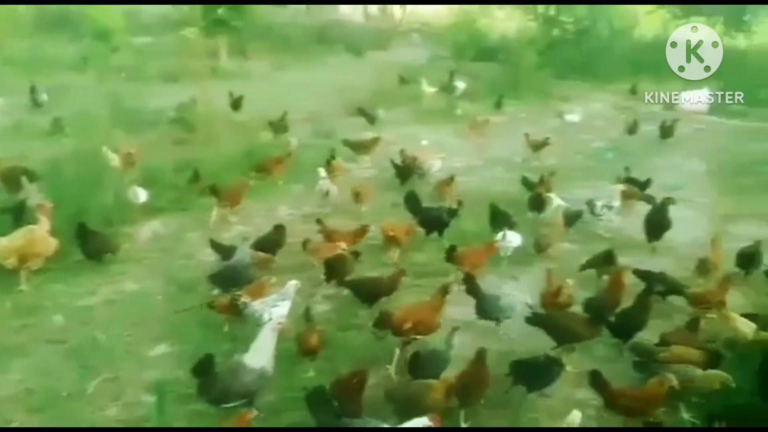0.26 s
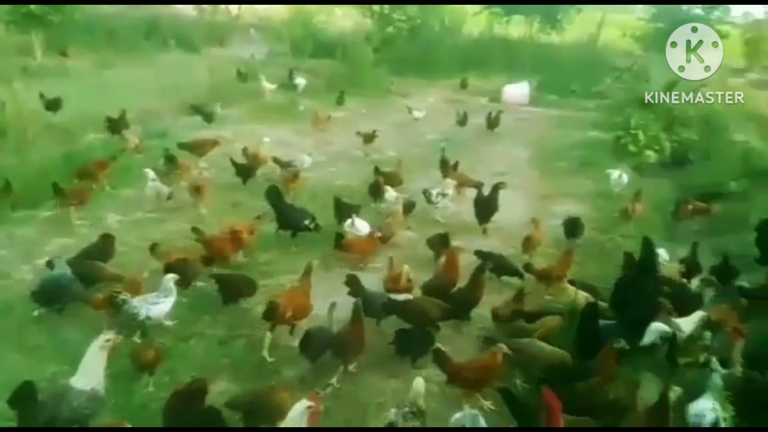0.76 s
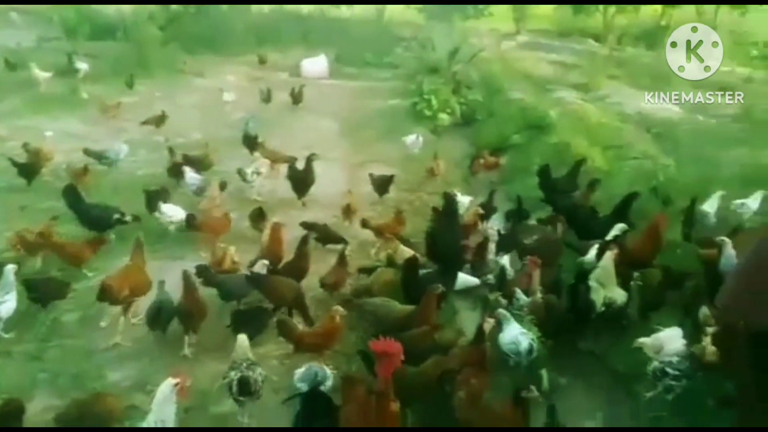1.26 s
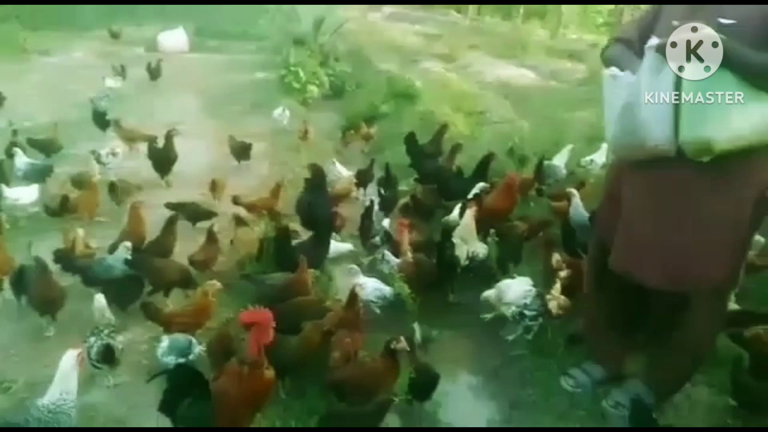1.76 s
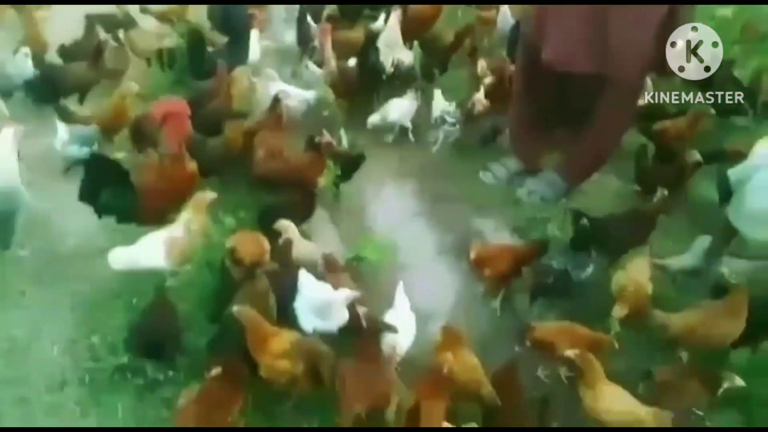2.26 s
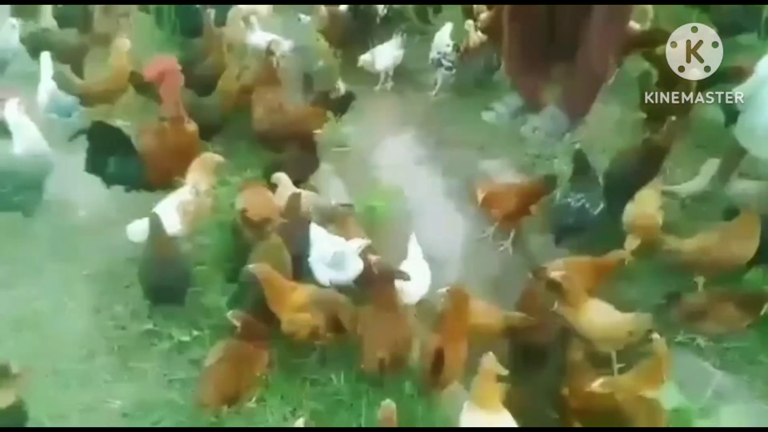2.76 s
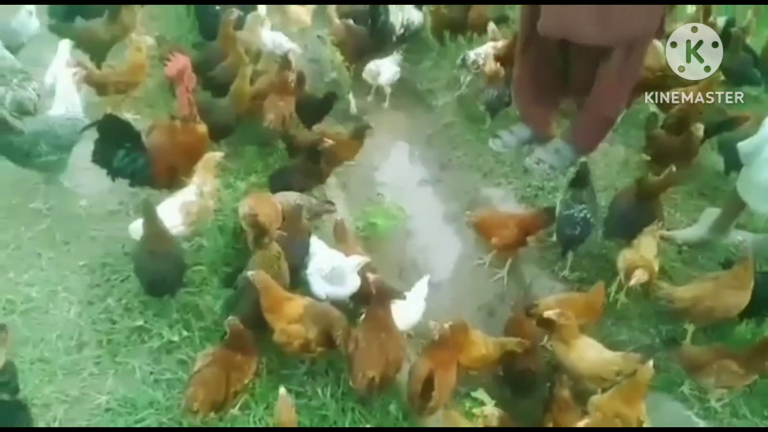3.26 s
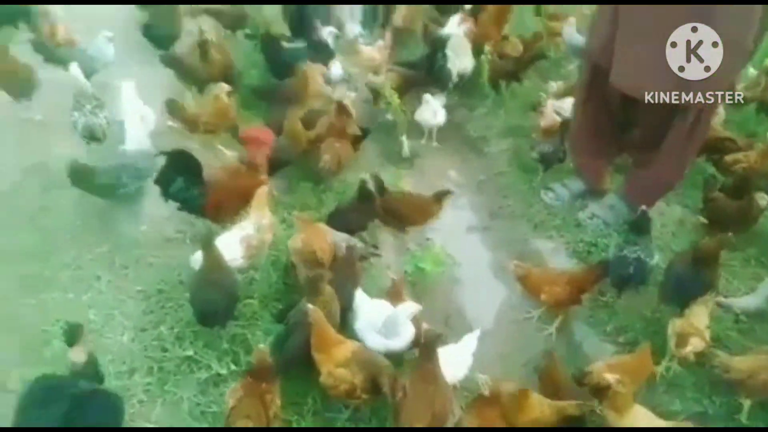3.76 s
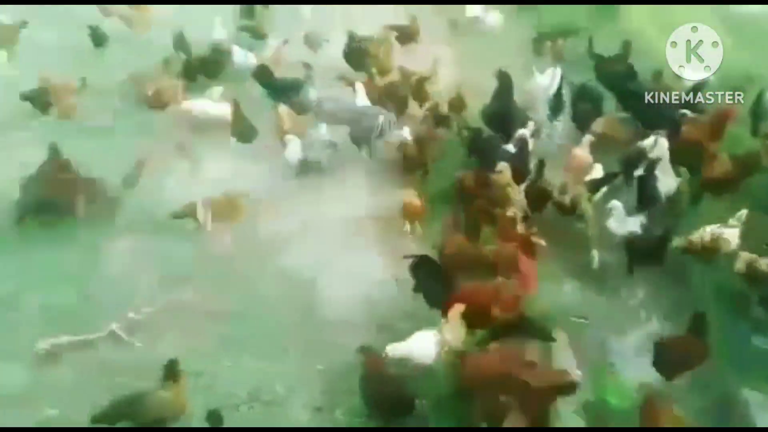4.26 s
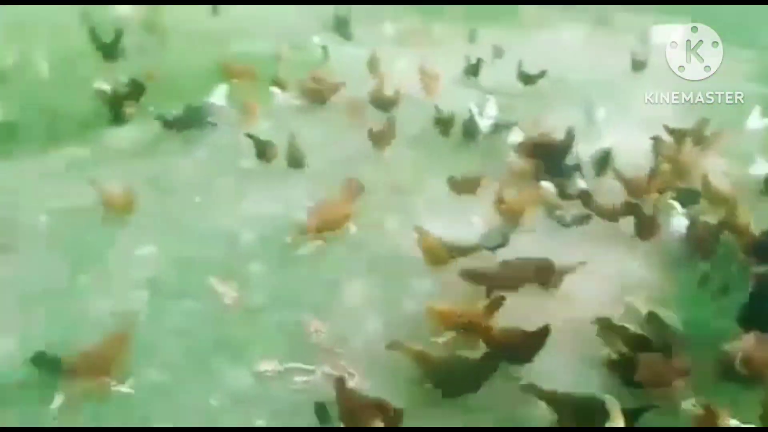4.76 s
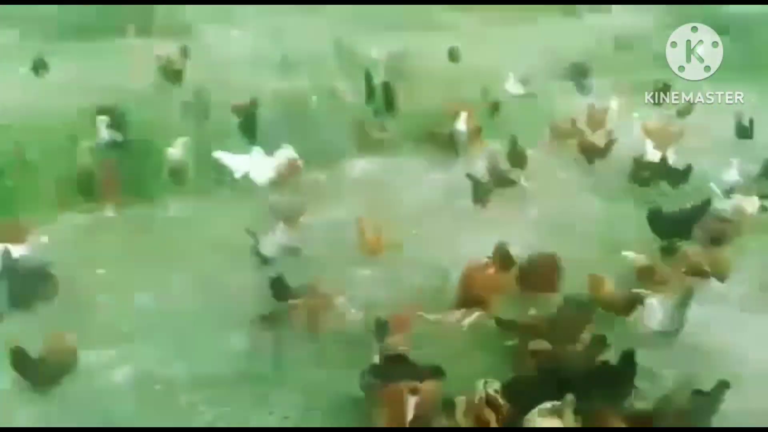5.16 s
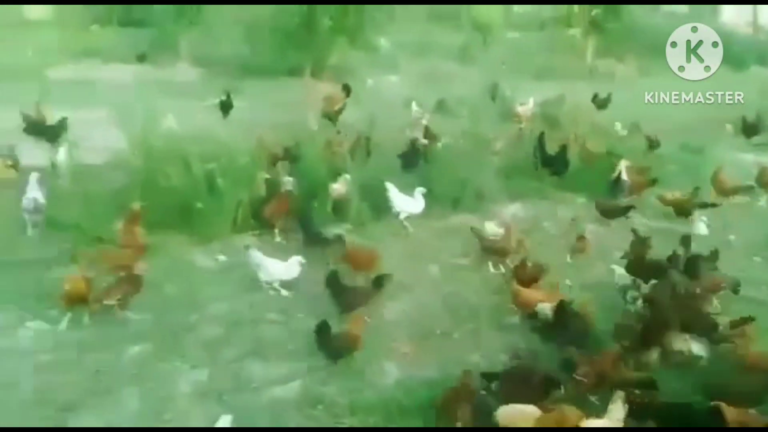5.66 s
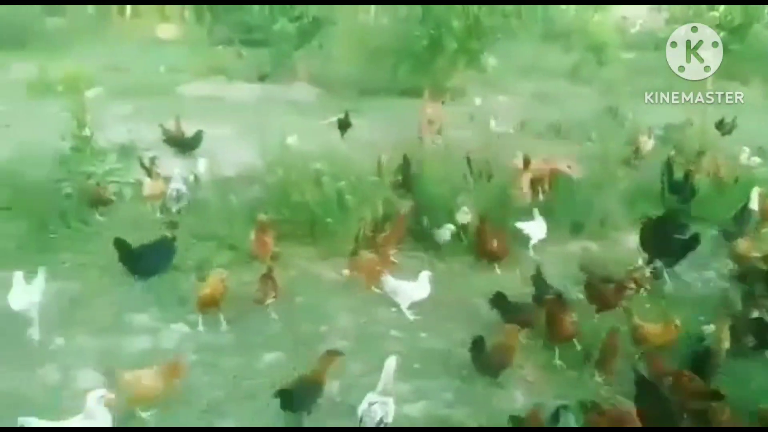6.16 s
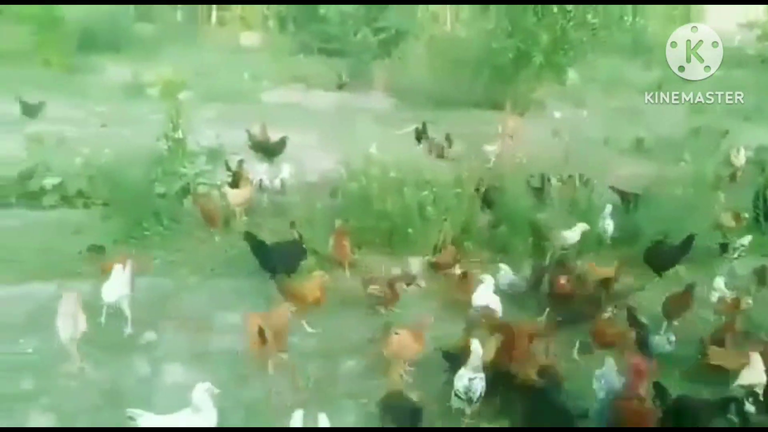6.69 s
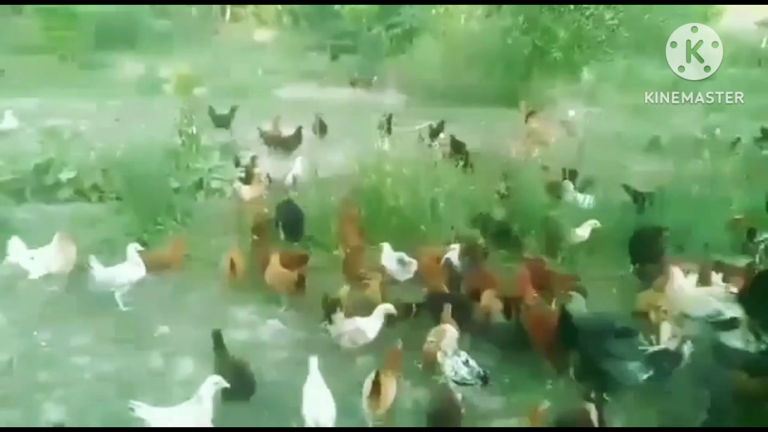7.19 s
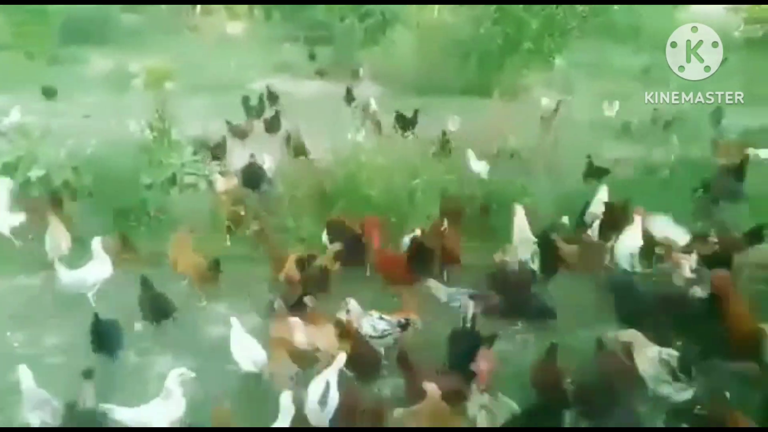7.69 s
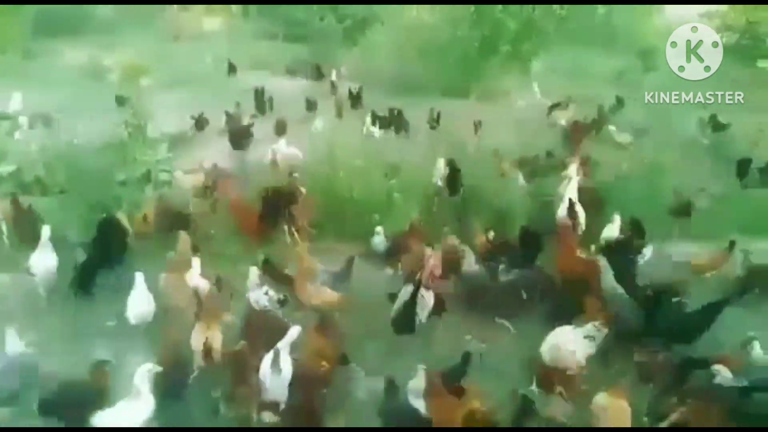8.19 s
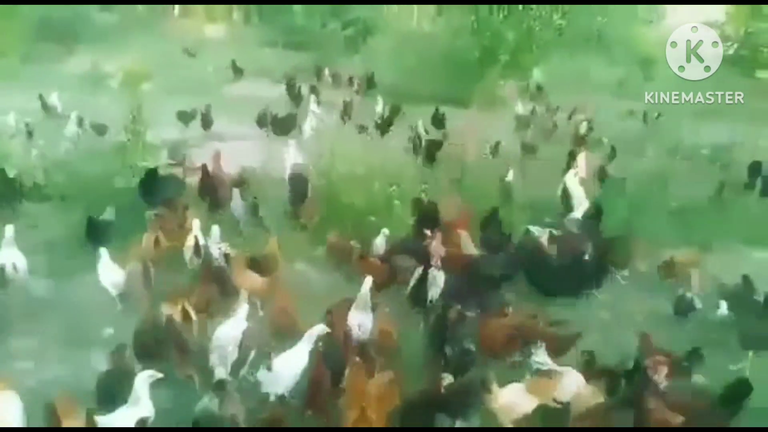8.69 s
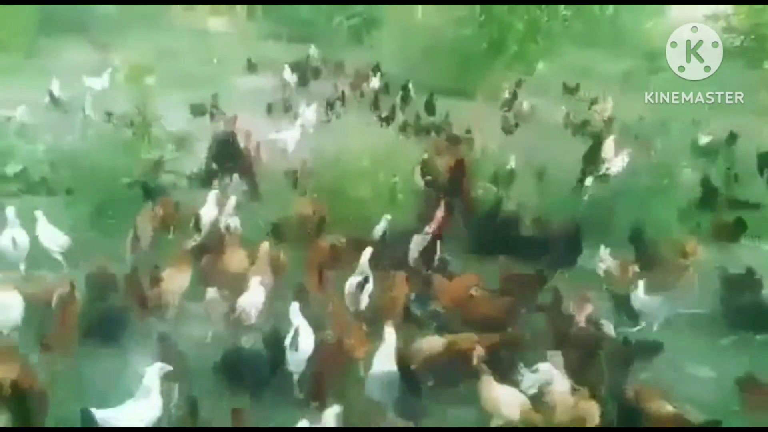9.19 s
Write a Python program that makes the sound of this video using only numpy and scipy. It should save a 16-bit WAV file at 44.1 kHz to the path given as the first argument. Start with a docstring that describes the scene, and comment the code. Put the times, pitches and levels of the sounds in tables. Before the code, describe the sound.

Open grassy yard, hand-held stereo microphone, low lumpy wind throughout. From 0 s dozens of young birds peep softly in short falling whistles, some nearer; at 0.1-0.5 s a gust roars, flutters and pops on the left. Low falling moans come around 0.8-1.6 s, then a harsh, ragged squawk at 1.75 s. The peeping drops out briefly near 2.2 s and returns. A distant cock holds a faint crow from 2.6 to 3.5 s. Finger thumps and scuffs strike the right at 2.8, 3.1 and 3.85 s, leaving that side muffled. At 4.3 s a loud sharp cluck opens a dense crowd of clucks, chips and quavering notes, with feet and wings rustling. Another strong cluck snaps at 6 s. Clucking thickens from 7.5 s; from 8.1 to 9 s one bird gives six clear yelps, each higher and shorter. Wind swells near 8.9 s, and clucks and peeps continue to the end.

```python
"""Young birds peep in falling whistles over a rumbling wind, in a big flock of hens and pullets crowding in for feed.
Then come moans, one harsh squawk, a far cock, dense clucks and quavering notes, and one bird's rising yelps.
Calls are swept sines, partials or resonant puffs, with dull yard echoes; wings and feet are shaped noise.
Wind on the hand-held microphone is low noise, with a gust that flutters and pops on the left.
A finger bumps the right port in thumps and scuffs, and then stays over it, muffling that side."""
import sys
import numpy as np
from scipy import signal
from scipy.fft import rfft, irfft, next_fast_len
from scipy.io import wavfile
from scipy.ndimage import uniform_filter1d

SR = 44100
rng = np.random.default_rng(int(sys.argv[2]) if len(sys.argv) > 2 else 0)


def pcm_store(signal):
    """Save signal as 16-bit PCM."""
    levels = np.round(np.clip(np.atleast_2d(signal), -1, 1) * 32767)
    wavfile.write(sys.argv[1], SR, levels.astype(np.int16).T)


N = 416304
TIME = np.arange(N) / SR
QUAVER_PER_S = 26   # pitch arches per second in a quavering note


def from_db(db):
    """Level: 20 dB is a tenfold amplitude."""
    return 10 ** (np.asarray(db) / 20)


def rms_one(x):
    """Normalisation: the mean square becomes one."""
    return x / np.sqrt(np.mean(x ** 2) + 1e-20)


def curve(rows, at=TIME):
    """Linear interpolation of each column of a table over its times."""
    s, *columns = np.transpose(rows)
    return [np.interp(at, s, column) for column in columns]


def band(x, hz, kind, order=2):
    """Butterworth filtering: a maximally flat passband."""
    sections = signal.butter(order, hz, kind, fs=SR, output="sos")
    return signal.sosfilt(sections, x + 1e-18)


def wander(n, per_s):
    """Slow random modulation: straight lines join unit normal values, per_s of them a second, about 0."""
    at = np.arange(n) * per_s / SR
    knots = rng.standard_normal(int(at[-1]) + 2)
    return np.interp(at, np.arange(len(knots)), knots)


def noise(spectrum):
    """Spectral shaping of white noise, uncorrelated between the two ports and of unit rms."""
    hz, db = np.transpose(spectrum)
    size = next_fast_len(N)
    bins = np.maximum(np.fft.rfftfreq(size, 1 / SR), 1)
    gain = from_db(np.interp(np.log(bins), np.log(hz), db))
    gain = gain * np.minimum(bins / hz[0], 1) ** 2   # 12 dB per octave below the first row
    white = rng.standard_normal((2, size))
    return rms_one(irfft(rfft(white) * gain, size)[:, :N])


def swell(s, rise, t60, hold=0):
    """Transient envelope: a Gaussian rise to 1 at time s, a hold, then exponential decay."""
    rising = np.exp(-np.minimum(((TIME - s) / rise) ** 2, 50))
    dying = from_db(-60 * np.clip((TIME - s - hold) / t60, 0, 3))
    return np.where(TIME < s, rising, dying)


def add(out, s, sound, pan_db):
    """Stereo localisation: the nearer port hears a bird louder and earlier (one sample each way per dB)."""
    for channel, side in enumerate((1, -1)):
        start = max(int(s * SR - side * pan_db), 0)
        part = sound[:max(N - start, 0)]
        out[channel, start:start + len(part)] += part * from_db(side * pan_db / 2)


def whistle(hz, overtone_db, jitter, flutter_db):
    """Frequency modulation of a near sine; its faint octave is cut off by the throat on high notes."""
    n = len(hz)
    phase = 2 * np.pi * np.cumsum(hz * (1 + jitter * wander(n, 243))) / SR
    envelope = np.sin(np.linspace(0, np.pi, n)).clip(0) ** 0.45
    envelope = envelope * from_db(flutter_db * wander(n, 89.4))
    overtone = from_db(overtone_db) / (1 + (2 * hz / 5700) ** 20)
    return np.sqrt(2) * envelope * (np.sin(phase) + overtone * np.sin(2 * phase))


def peep(length, start_hz, end_hz, arch, overtone_db):
    """Frequency glide: the pitch bends and sags ever faster; a steep fall roughens pitch and loudness."""
    rough_per_fall = 0.047   # roughness (0-1) per octave a second
    u = np.linspace(0, 1, int(length * SR))
    sag = .45 * u + .55 * u ** 3
    hz = (start_hz + (end_hz - start_hz) * sag) * (1 + arch * np.sin(np.pi * u))
    rough = np.clip(rough_per_fall * np.log2(start_hz / end_hz) / length, 0, .7)
    shaken_hz = hz * (1 + .08 * rough * wander(len(u), 900))
    voice = whistle(shaken_hz, overtone_db, jitter=.006, flutter_db=3)
    shake_db = 5 * rough * (wander(len(u), 500) - rough)
    return voice * from_db(shake_db + 3 * (u - .5))   # the voice gains 3 dB along the note


def trill(length, start_hz, end_hz, rate):
    """Periodic frequency modulation: the pitch bounds in arches and the note weakens at each dip."""
    quaver_depth = 0.1384   # share of the pitch
    t = np.arange(int(length * SR)) / SR
    arches = np.cumsum(rate * (1 + 0.286 * wander(len(t), 40))) / SR
    bound = np.abs(np.sin(np.pi * arches + rng.uniform(0, np.pi))) - 2 / np.pi   # mean near 0
    hz = np.linspace(start_hz, end_hz, len(t)) * (1 + quaver_depth * bound)
    return whistle(hz, overtone_db=-22, jitter=0.0256, flutter_db=4.0) * from_db(3.0 * bound)


def chip(length, top_hz):
    """Frequency modulation: a young bird's quick, quavering note follows part of a pitch arch."""
    u = np.linspace(-1, 1, int(length * SR)) + rng.uniform(-0.738, 1)
    return whistle(top_hz * np.exp(-.11 * u ** 2), overtone_db=-22, jitter=.075, flutter_db=6)


def cluck(length, main_hz, rough, arch=.2, rasp_hz=300, breath_db=-20):
    """Source and filter: the throat lifts the second partial, syrinx beats rasp it and air hisses through."""
    # partials of the voice, from the voice pitch upwards: mean level/dB
    partial_levels = [-12, 11, -7.5, -18, -30, -31, -43.5]
    n = int(3 * length * SR)
    u = np.linspace(-3, 3, n)   # in half lengths from the middle
    # the air comes in uneven pushes, each louder and higher at once
    push = wander(n, 150)
    bend = rough * (.1 * push + .06 * wander(n, 500) + .06 * rng.standard_normal() * u)
    pitch = main_hz / 2 * np.exp(bend - 2 * arch * np.tanh(u ** 2 / 2))
    phase = 2 * np.pi * np.cumsum(pitch) / SR
    voice = np.zeros(n)
    for k, db in enumerate(partial_levels, 1):
        voice += from_db(db + 4.7 * rng.standard_normal()) * np.sin(k * phase)
    voice = rms_one(voice)
    hiss = rms_one(band(rng.standard_normal(n), [1800, 3300], "band"))
    breath = from_db(breath_db) * hiss * (1 + np.sin(phase))
    beats = np.sin(2 * np.pi * np.cumsum(rasp_hz * (1 + 0.375 * wander(n, 200.7))) / SR)
    rasp = (1 + .9 * rough * beats) * from_db(6 * rough * push)
    # a loud core; before and after it the half-closed beak lets through a softer, duller voice
    core, skirt = np.exp(-u ** 8), .13 * np.hanning(n)
    call = rasp * ((voice + breath) * (core + skirt) + skirt * np.sin(phase))
    return rms_one(call) / np.sqrt(3)


def near_birds(peep_overtone_db=-21, pan_db=0.5):
    """Superposition of the peeps, quavering notes and clucks that stand out of the flock."""
    # whistled peeps: t/s, length/s, start f/Hz, end f/Hz, arch (share of the pitch), level/dB
    near_peeps = [(0, 0.062, 2510, 2030, 0.0012, -46), (0.052, 0.078, 4300, 3350, -0.04, -51),
                  (0.205, 0.069, 2630, 2470, 0.024, -46.5), (0.243, 0.27, 2870, 2045, 0.091, -45),
                  (0.387, 0.09, 2480, 2110, 0.0012, -39), (0.49, 0.11, 2814, 2040, -0.033, -47),
                  (0.55, 0.13, 3670, 2660, -0.0085, -48), (0.64, 0.16, 3930, 3130, 0.0071, -53.5),
                  (0.581, 0.14, 2650, 1843, 0.02, -39.5), (0.749, 0.085, 3350, 1950, -0.032, -34.5),
                  (0.935, 0.087, 2840, 2428, 0.0027, -43.5), (0.965, 0.25, 2368, 1940, 0.024, -47.5),
                  (1.149, 0.17, 2886, 2380, -0.057, -47), (1.24, 0.24, 2785, 2560, 0.00036, -50),
                  (1.215, 0.11, 4960, 4460, 0.055, -53), (1.318, 0.036, 2390, 1760, -0.024, -39.5),
                  (1.345, 0.17, 2510, 2075, -0.036, -44), (1.478, 0.052, 2960, 2420, -0.066, -35.5),
                  (1.48, 0.12, 2370, 1676, -0.096, -50), (1.64, 0.15, 3750, 3100, -0.026, -46),
                  (1.719, 0.12, 2590, 2204, -0.016, -40.5), (1.885, 0.055, 1895, 1560, -0.041, -41),
                  (2.384, 0.082, 3000, 2440, -0.023, -48), (2.569, 0.057, 2950, 2380, -0.015, -45.5),
                  (2.565, 0.33, 2525, 2150, -0.025, -46.5), (2.63, 0.17, 2850, 2600, 0.021, -50.5),
                  (2.92, 0.066, 2520, 2300, 0.0051, -39), (3.01, 0.19, 2760, 2100, 0.16, -43),
                  (3.57, 0.27, 2440, 2069, -0.051, -42.5), (3.94, 0.13, 2740, 1800, 0.056, -45),
                  (8.13, 0.043, 3466, 2300, 0.038, -42), (8.618, 0.075, 3610, 2920, -0.045, -40),
                  (9.045, 0.042, 3440, 2560, -0.0047, -39.5), (9.168, 0.059, 3065, 2140, -0.053, -45),
                  (9.269, 0.081, 2150, 1685, -0.016, -33.5)]
    # quavering notes: t/s, length/s, start f/Hz, end f/Hz, level/dB
    near_trills = [(4.598, 0.043, 2490, 2630, -35), (4.686, 0.024, 1510, 1940, -27),
                   (4.73, 0.038, 1945, 2480, -28), (4.775, 0.023, 1860, 2050, -19),
                   (5.101, 0.021, 2030, 1710, -27), (5.575, 0.024, 1700, 1930, -34),
                   (6.777, 0.15, 2990, 3190, -38.5), (7.015, 0.069, 2700, 2920, -38.5),
                   (7.406, 0.11, 3510, 3300, -41), (7.638, 0.039, 2690, 2890, -37)]
    # clucks: middle t/s, length/s, strongest partial f/Hz, level/dB
    near_clucks = [(2.156, 0.027, 1537, -47.5), (2.619, 0.028, 1698, -42), (3.084, 0.037, 1580, -42),
                   (3.957, 0.022, 1697, -36), (4.051, 0.033, 1068, -38.5), (4.168, 0.035, 1206, -32),
                   (4.211, 0.026, 1100, -35.5), (4.28, 0.026, 1563, -19.5), (4.381, 0.024, 1305, -33),
                   (4.421, 0.045, 1278, -30.5), (4.471, 0.013, 1710, -25.5), (4.518, 0.014, 1595, -32),
                   (4.585, 0.028, 1234, -32.5), (5.146, 0.014, 1940, -40), (5.229, 0.029, 1600, -34.5),
                   (5.454, 0.017, 1860, -35.5), (5.875, 0.03, 1517, -31.5), (5.981, 0.022, 1840, -17),
                   (6.059, 0.0095, 1606, -25.5), (6.076, 0.011, 1660, -27.5), (6.092, 0.006, 1670, -29),
                   (6.13, 0.023, 1198, -38), (6.31, 0.04, 1244, -37), (6.392, 0.02, 1694, -33.5),
                   (6.643, 0.046, 1702, -33.5), (7.21, 0.061, 1605, -33.5), (7.295, 0.038, 1250, -35.5),
                   (7.535, 0.023, 1817, -30.5), (7.582, 0.02, 1833, -26.5), (7.638, 0.025, 1616, -31.5),
                   (7.724, 0.038, 1790, -28), (7.8, 0.029, 1744, -28.5), (8.591, 0.033, 1720, -32),
                   (8.926, 0.042, 1816, -31), (9.129, 0.019, 1860, -32)]
    rough_per_s = 19.04   # the longer a cluck, the rougher (0-1)
    out = np.zeros((2, N))
    for s, length, start_hz, end_hz, arch, db in near_peeps:
        call = peep(length, start_hz, end_hz, arch, peep_overtone_db)
        add(out, s, from_db(db) * call, rng.normal(0, 1.6))
    for s, length, start_hz, end_hz, db in near_trills:
        add(out, s, from_db(db) * trill(length, start_hz, end_hz, QUAVER_PER_S), pan_db)
    for s, length, main_hz, db in near_clucks:
        call = cluck(length, main_hz, min(rough_per_s * length, .85))
        add(out, s - len(call) / SR / 2, from_db(db) * call, pan_db)
    return out


def yelps(pan_db=0.0):
    """Frequency modulation: one bird works itself up, each arched note higher and shorter than the last."""
    # rising yelps: t/s, level/dB
    yelp_rows = [(8.124, -28.5), (8.31, -27.5), (8.457, -24), (8.603, -25), (8.736, -25.5), (8.877, -25)]
    first_hz, last_hz, climb = 1740, 2139, .65   # climbs fast at first, then more slowly (exponent)
    first_s, last_s = 0.137, 0.095   # note lengths
    first_top, last_top, arch = .7, 0.334, 0.22   # place of the top (0-1), coming earlier; bend
    out = np.zeros((2, N))
    for (s, db), along in zip(yelp_rows, np.linspace(0, 1, len(yelp_rows))):
        top_hz = first_hz + (last_hz - first_hz) * along ** climb
        length = first_s + (last_s - first_s) * along
        u = np.linspace(0, 1, int(length * SR))
        top_at = first_top + (last_top - first_top) * along ** 2
        hz = top_hz * (1 - arch * (u - top_at) ** 2)
        note = whistle(hz, overtone_db=-47.0, jitter=0.0017, flutter_db=1.0)
        add(out, s, from_db(db) * note, pan_db)
    return out


def moans():
    """Harmonic synthesis: low, falling calls voiced through the second to fourth partials."""
    # moans: t/s, length/s, starting pitch f/Hz, level/dB, roughness (0-1)
    moan_rows = [(0.778, 0.053, 399, -49, 0.03), (0.977, 0.054, 409, -42, 0.2),
                 (1.105, 0.114, 453, -42, 0.28), (1.576, 0.07, 526, -40.5, 0.36)]
    out = np.zeros((2, N))
    for s, length, hz, db, rough in moan_rows:
        n = int(length * SR)
        pitch = np.linspace(hz, .82 * hz, n) * (1 + .12 * rough * wander(n, 350))
        phase = 2 * np.pi * np.cumsum(pitch) / SR
        voice = (1 - rough) * np.sin(2 * phase)
        voice += (.4 + .6 * rough) * np.sin(3 * phase) + .2 * np.sin(4 * phase)
        add(out, s, from_db(db) * voice * np.sqrt(np.hanning(n)), 0)
    return out


def squawk(jitter=.04, breath=0.41):
    """Source and filter: ragged puffs of air from the syrinx ring in the resonances of a strained throat."""
    # throat resonances: centre f/Hz, width/Hz, level/dB
    throat = [(1520, 305, 4), (2270, 970, -1.5), (3730, 620, -4), (5360, 700, -10)]
    start_s, length_s, pitch_hz, level_db = 1.735, .235, 419, -38
    u = np.linspace(0, 1, int(length_s * SR))
    n = len(u)
    hz = pitch_hz * (1 - .15 * u ** 2 + jitter * wander(n, pitch_hz))   # sinks
    cycles = np.cumsum(hz) / SR
    puffs = rms_one(np.diff(np.floor(cycles), prepend=0))   # one pulse a cycle
    puffs = puffs + breath * (1 + np.cos(2 * np.pi * cycles)) * rng.standard_normal(n)
    voice = np.zeros(n)
    for centre, width, db in throat:
        voice += from_db(db) * band(puffs, [centre - width / 2, centre + width / 2], "band")
    envelope = np.sin(np.pi * u ** 1.4).clip(0) ** 1.3   # swells slowly, falls faster
    out = np.zeros((2, N))
    add(out, start_s, from_db(level_db) * rms_one(voice) * envelope, 0)
    return out


def call_times(per_s):
    """Poisson-like process: random moments at a changing rate."""
    return TIME[rng.random(N) < per_s / SR]


def crowd(cluck_hz=1700, chip_hz=2200, peep_hz=2700, trill_hz=2400, chip_db=-3, trill_db=-5):
    """Random superposition: the rest of the flock, of all sizes, at many distances and on both sides."""
    # hens in the crowd: t/s, clucks per s, level/dB
    cluck_rate, cluck_db = curve([(0, 3, -70), (3.95, 2, -45.5), (4.3, 42, -46), (6.2, 42, -43),
                                  (7.5, 60, -42.5), (9.44, 45, -44)])
    # young birds in the crowd: t/s, peeps per s, level/dB
    peep_rate, peep_db = curve([(0, 91, -57), (.7, 106, -56), (1.85, 79.6, -55), (2.2, 3.5, -81),
                                (2.45, 83.4, -53.5), (4, 25, -52), (6.5, 8.1, -51.5), (9.44, 27.5, -47.5)])
    shortest_s, longest_s, hurried_s = .04, .15, 0.078   # the longest peeps shrink as the birds rush in

    # a positive "small" is a smaller, higher-pitched bird
    def any_cluck(s, small):
        return cluck(rng.uniform(0.01374, .036), cluck_hz * np.exp(0.18 * small), rng.uniform(0.453, 1))

    def any_chip(s, small):
        call = chip(rng.uniform(.012, 0.043), chip_hz * np.exp(.25 * small))
        return call * from_db(-2.5 * small)

    def any_trill(s, small):
        hz = trill_hz * np.exp(.2 * small)
        length, end_hz = rng.uniform(0.0383, .11), hz * rng.uniform(.85, 1.3)
        call = trill(length, hz, end_hz, QUAVER_PER_S * rng.uniform(0.697, 1.4))
        return call * from_db(-3 * small)

    def any_peep(s, small):
        longest = np.interp(s, [0, TIME[-1]], [longest_s, hurried_s])
        length = shortest_s + (longest - shortest_s) * rng.random()
        hz = peep_hz * np.exp(0.23 * small)
        end_hz, arch = hz * rng.uniform(0.67, .92), rng.uniform(-0.0394, .06)
        return peep(length, hz, end_hz, arch, overtone_db=-25.5) * from_db(-1.5 * small ** 2)

    # calls per s, level/dB, spread of distances/dB, voice
    kinds = [(cluck_rate, cluck_db, 3.9, any_cluck),
             (2 * cluck_rate, cluck_db + chip_db, 3, any_chip),
             (.3 * cluck_rate, cluck_db + trill_db, 2.5, any_trill),
             (peep_rate, peep_db, 2.2, any_peep)]
    out = np.zeros((2, N))
    for per_s, db, spread_db, voice in kinds:
        for s in call_times(per_s):
            small, near_db, pan_db = rng.standard_normal(3).clip(-2, 1.6) * [1, spread_db, 3]
            add(out, s, voice(s, small) * from_db(db[int(s * SR)] + near_db), pan_db)
    return out


def rustle(wingbeat_db=6.0):
    """Amplitude-modulated noise: many feet crackle in the grass and wings beat in short flurries."""
    # feet and feathers in the grass: t/s, level/dB
    feet_levels = [(0, -60.5), (2.3, -57), (4, -64), (4.35, -46.5), (6.4, -51.5), (7.5, -44.5), (8, -50),
                   (9.44, -61.5)]
    # spectrum of the feet: f/Hz, relative level/dB per Hz
    feet_spectrum = [(150, -5), (350, 3.5), (600, -6), (1000, -5), (1700, -10.5), (2800, -2), (4000, -14),
                     (6500, -21.5), (10000, -24.5), (15000, -36.5)]
    # wing flurries and brushes through grass: t/s, rise/s, 60 dB decay/s, level/dB
    flurries = [(.8, 0.029, 0.34, -50), (2.08, 0.013, 0.11, -44), (2.75, 0.14, 0.35, -44),
                (4.459, 0.015, 0.094, -36), (5.98, 0.036, 0.16, -38)]
    # spectrum of the wings: f/Hz, relative level/dB per Hz
    wing_spectrum = [(300, 7.5), (900, 6), (1500, -4.5), (2500, -17.5), (4000, -7), (6000, -12),
                     (9000, -16), (15000, -29)]
    crackle_db = 3.2 * wander(N, 700) + 1.8 * wander(N, 35)
    feet = from_db(curve(feet_levels)[0] + crackle_db)
    wings = sum(from_db(db) * swell(s, rise, t60) for s, rise, t60, db in flurries)
    wings = wings * from_db(wingbeat_db * wander(N, 80))
    return feet * noise(feet_spectrum) + wings * noise(wing_spectrum)


def finger_bumps(slip_db=3.5):
    """Pressure pulses and friction: each touch pumps air into the right port and the skin scuffs unevenly."""
    # touches: t/s, contact time/s, thump level/dB, scuff level/dB (before a 3 dB cut)
    touches = [(2.762, 0.014, -11.5, -11.5), (2.815, 0.0074, -13.5, -17.5), (3.126, 0.041, -8.5, -20),
               (3.251, 0.03, -29, -34), (3.848, 0.023, -9.5, -20)]
    # spectrum of the pumped air: f/Hz, relative level/dB per Hz
    thump_spectrum = [(35, -15), (60, 6.5), (130, -1), (200, -9), (350, -16), (700, -55), (8000, -95)]
    # spectrum of the skin: f/Hz, relative level/dB per Hz
    scuff_spectrum = [(100, -2), (350, 3.5), (800, -3), (1500, -8.5), (2800, -13.5), (5000, -28.5),
                      (9000, -37), (15000, -39.5)]
    rise_s, thump_t60_s, scuff_t60_s = 0.012, 0.085, 0.11
    thump = sum(from_db(db) * swell(s, rise_s, thump_t60_s, hold) for s, hold, db, _ in touches)
    scuff = sum(from_db(db) * swell(s, rise_s, scuff_t60_s, hold) for s, hold, _, db in touches)
    air = noise(thump_spectrum)[0]
    air = air / np.sqrt(uniform_filter1d(air ** 2, SR // 40) + 1e-6)   # evens out the short-term level
    skin = noise(scuff_spectrum)[0] * from_db(slip_db * wander(N, 450) - 3.0)
    return (thump * air + scuff * skin) * from_db([[-32], [0]])   # faint on the left


def gust_pops(count=7):
    """Filtered impulses: dull pops come ever more slowly and softly as the gust dies."""
    start_s, run_s, first_db, fade_db = .294, .16, -15.5, 6   # first level is before filtering and gain
    pops = np.zeros(N)
    for late in np.linspace(0, 1, count) ** 2:
        at = int((start_s + run_s * late) * SR)
        pops[at] = from_db(first_db - fade_db * late) * rng.choice([-1, 1])
    dull = band(band(pops, 970, "low", order=4), 90, "high", order=1)
    return 24 * dull   # makes up for height lost in the filters


def wind(level_db=7.0, lump_db=4.0, shared=1.0):
    """Turbulence noise: lumpy rumble, partly common to both ports; one gust flutters and pops on the left."""
    # spectrum of the steady wind: f/Hz, relative level/dB per Hz
    wind_spectrum = [(25, -29.5), (40, -9), (55, 3), (85, -1), (130, -9.5), (200, -18.5), (350, -36.5),
                     (700, -61.5), (4000, -69)]
    # steady wind on the ports: t/s, level/dB (before level_db is added)
    wind_levels = [(0, -41.5), (.6, -46), (1.8, -44.5), (2.2, -48), (4, -50), (5.8, -52.5), (7.1, -47),
                   (8.1, -48.5), (8.9, -39), (9.44, -47.5)]
    # spectrum of the gust: f/Hz, relative level/dB per Hz
    gust_spectrum = [(30, -14), (60, 8.5), (130, 4.5), (250, -3.5), (450, -11), (900, -29), (4000, -73)]
    # gust on the left port: t/s, level/dB
    gust_levels = [(0, -29.5), (.09, -36), (.135, -20), (.34, -26), (.47, -35.5), (.55, -95)]
    rumble = rms_one(noise(wind_spectrum) + shared * noise(wind_spectrum)[0])
    rumble = rumble * from_db(curve(wind_levels)[0] + level_db + lump_db * wander(N, 12))
    flutter_db = 4.2 * wander(N, 70.1)
    gust = noise(gust_spectrum)[0] * from_db(curve(gust_levels)[0] + flutter_db)
    return rumble + (gust + gust_pops()) * from_db([[0], [-18]])


def far_cock():
    """Harmonic synthesis: a held crow, of which the second and third partials carry across the yard."""
    # crow: t/s, pitch f/Hz, level/dB
    crow_rows = [(2.6, 480, -64), (2.8, 482, -55), (3.42, 487, -54), (3.5, 458, -61)]
    hz, db = curve(crow_rows)
    phase = 2 * np.pi * np.cumsum(hz * (1 + 0.013 * wander(N, 130))) / SR
    crowing = (TIME > crow_rows[0][0]) & (TIME < crow_rows[-1][0])
    return crowing * from_db(db) * (np.sin(2 * phase) + .5 * np.sin(3 * phase))


def yard(x, echo_db=-18, t60=0.18):
    """Convolution with sparse, dull, decaying echoes from ground, bushes and walls."""
    t = np.arange(SR // 3) / SR
    sparse = rng.standard_normal((2, len(t))) * (rng.random((2, len(t))) < .02)
    echoes = sparse * from_db(-60 * t / t60) * (t > .004)
    echoes = band(echoes, 5600, "low", order=1)
    echoes = echoes / np.sqrt(np.sum(echoes ** 2) / 2)   # unit mean energy per port
    return x + from_db(echo_db) * signal.fftconvolve(x, echoes, axes=1)[:, :N]


def shaded(x, muffle_hz=380):
    """Low-pass obstruction: the finger over the right port lets the bass through and little of the rest."""
    # finger over the right port: t/s, share of the port left open (0-1)
    openness = [(2.75, 1), (2.87, 0.03), (3.8, 0.12), (3.93, 0.33), (4.5, 0), (9.44, 0)]
    bass = band(x[1], muffle_hz, "low", order=1)
    return np.array([x[0], bass + curve(openness)[0] * (x[1] - bass)])


def scene():
    """Superposition: flock and yard as the two ports hear them, with wind and handling on top."""
    voices = near_birds() + yelps() + moans() + squawk() + crowd() + far_cock()
    return shaded(yard(voices) + rustle()) + wind() + finger_bumps()


def record(dry):
    """Band limiting and soft saturation: the deepest bass is cut, peaks are rounded, the top is cut."""
    cutoff_hz = 15300
    rounded = 1.13 * np.tanh(band(dry, 36, "high", order=3) / 1.261)
    top_cut = signal.ellip(10, .1, 80, cutoff_hz, fs=SR, output="sos")
    return signal.sosfilt(top_cut, rounded)


dry = scene()
out = record(dry)
pcm_store(out)
```